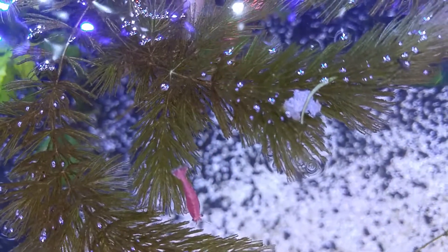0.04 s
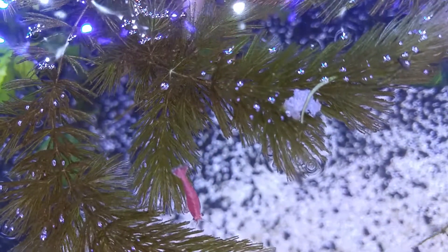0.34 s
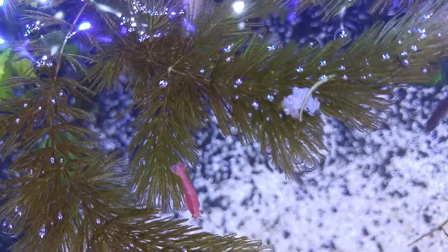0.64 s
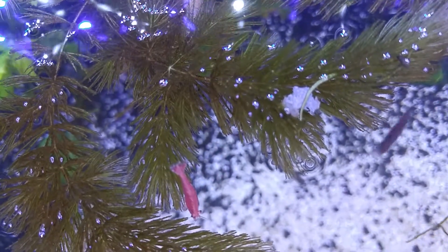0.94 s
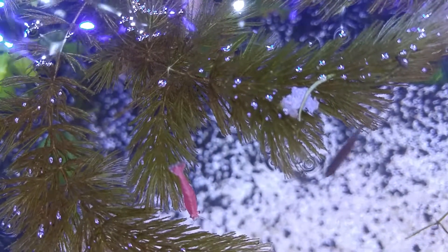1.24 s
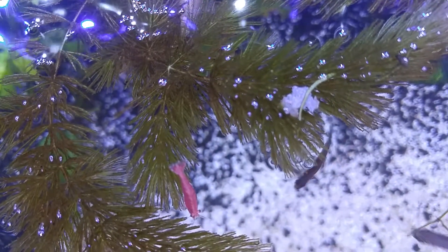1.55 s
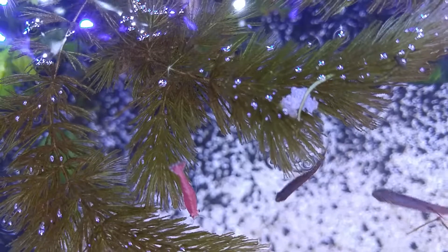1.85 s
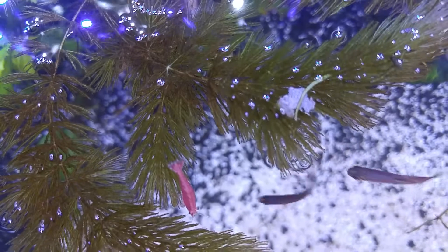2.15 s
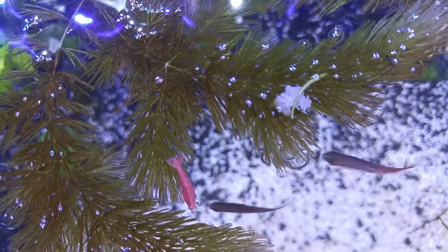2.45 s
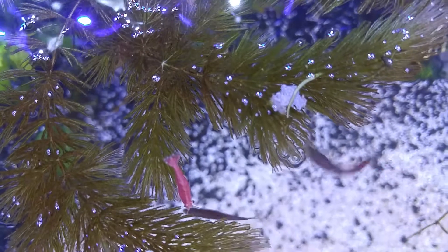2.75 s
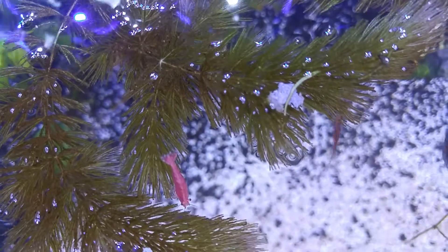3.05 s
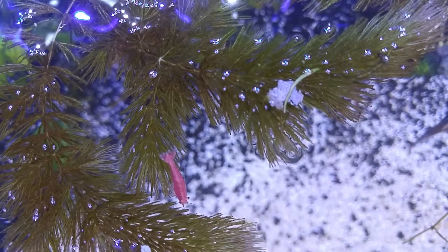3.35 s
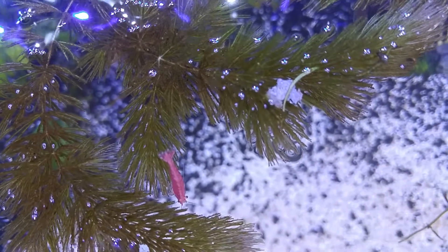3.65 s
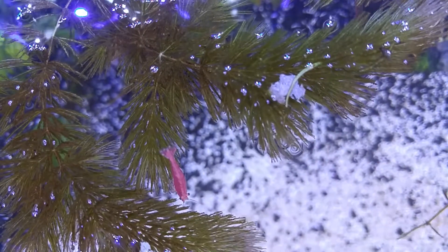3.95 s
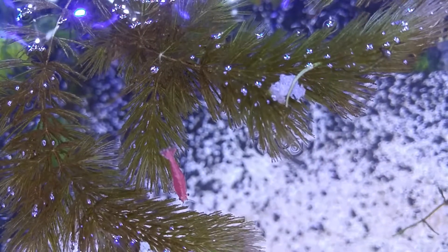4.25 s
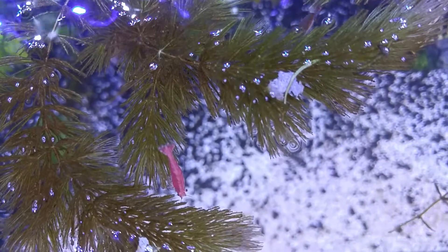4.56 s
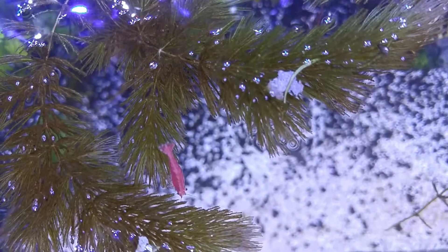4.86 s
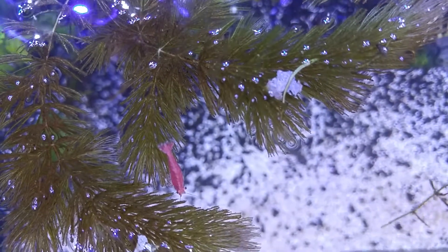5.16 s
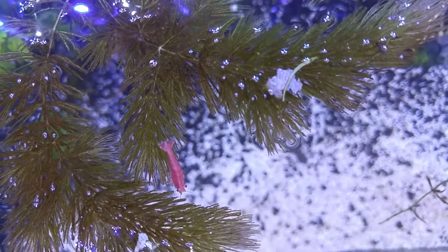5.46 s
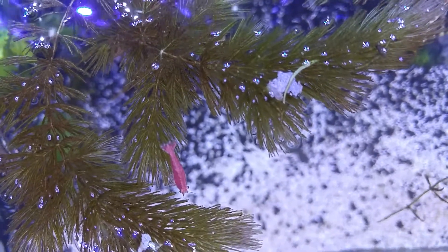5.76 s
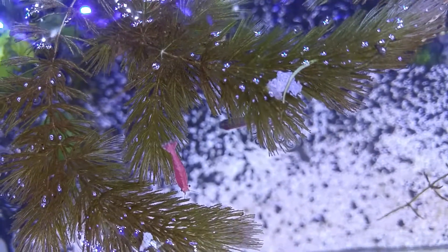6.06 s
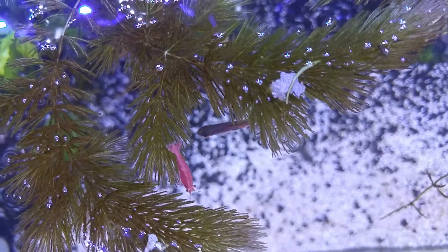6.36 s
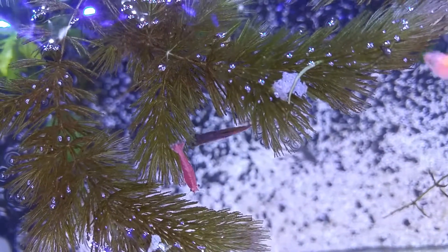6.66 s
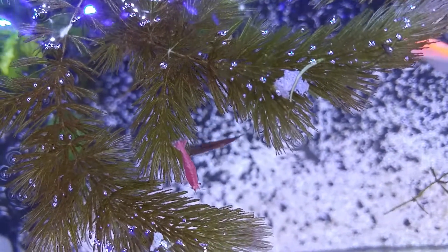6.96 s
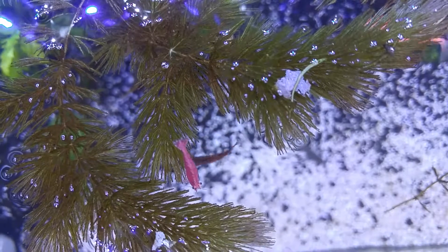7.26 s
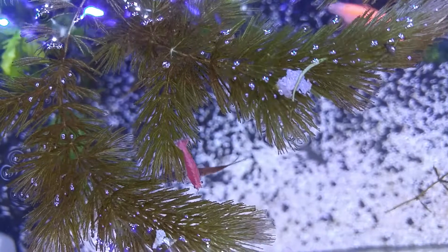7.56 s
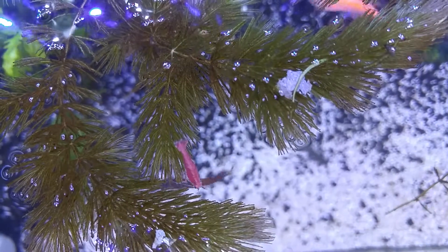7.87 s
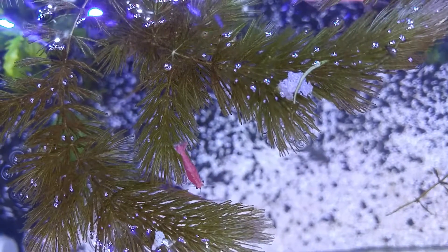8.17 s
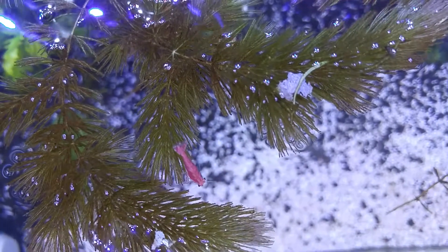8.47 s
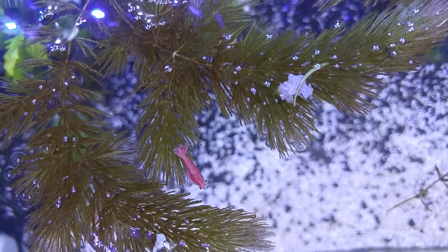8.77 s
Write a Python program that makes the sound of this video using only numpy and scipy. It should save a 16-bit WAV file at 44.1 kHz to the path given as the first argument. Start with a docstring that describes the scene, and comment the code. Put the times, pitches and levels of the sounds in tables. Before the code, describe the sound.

Heard from beside the glass of an indoor fish tank, a pump drones and chatters steadily over gently circulating water and a faint fizz. Early on there is a thin trickle, with small bubble ticks and several light clacks. The trickle fades, a few soft plops follow and the hum eases slightly, continuing with sparser ticks and a couple of faint clacks near the end.

```python
"""An aquarium pump hums on mains power, close by in a quiet room. Its loose rotor chatters on every
turn, now and then with a harder clack, and its electronics whine faintly. At first a light trickle
runs, and tiny bubbles tick and fizz. From 1.4 to 3.4 s the pump eases a little as its load drops.
After 2 s the trickle dies away and the fizz softens slightly; around 3 s the water gives a few soft
plops. The pump, the flowing water and the bubbles carry on to the end."""
import sys
import numpy as np
from scipy import signal
from scipy.fft import rfft, irfft
from scipy.io import wavfile

SR = 44100
rng = np.random.default_rng(int(sys.argv[2]) if len(sys.argv) > 2 else 0)


def put_to_file(sound):
    """Save the sound as 16-bit audio at rate SR, in the file named by the first command-line argument."""
    columns = np.atleast_2d(sound).T  # one column per channel
    safe = np.clip(columns, -1, 1)
    whole_steps = np.round(safe * 32767)
    wavfile.write(sys.argv[1], SR, whole_steps.astype(np.int16))


N = 389403
TIME = np.arange(N) / SR
MAINS_HZ = 60.037  # the rotor turns once per cycle of the mains

# the rotor's knocks within one turn: place_in_turn (0-1), force_db
ROTOR_KNOCKS = [(.02, 0), (0.238, -0.5), (0.391, 1.5), (0.739, 2)]
# how the housing and tank shape the sound of a knock: pitch_hz, gain_db
HOUSING_TONE = [(450, -55), (520, -37), (600, -12), (700, -11), (835, 2.5), (930, -6), (1010, -0.5),
                (1250, -13), (1480, -23.5), (1630, -21.5), (2070, -25), (2500, -39), (4000, -49.5)]


def pump_hum(turns, drone_db=-47.3, overtones_db=-47, waver=0.031):
    """The sound that repeats on every turn: a magnetic drone and the overtones of the knocks."""
    # the pump's steady tones, the drone first: multiple_of_mains, relative_db
    hum_tones = [(2, 0), (3, -26.5), (4, -25), (5, -27), (6, -14), (7, -16.5), (8, -24), (9, -36.5),
                 (10, -18), (11, -41.5), (12, -38.5), (13, -36), (14, -8.5), (15, -18), (16, -14),
                 (17, -22.5), (18, -27), (19, -24.5), (20, -28.5), (21, -24.5), (22, -32.5), (23, -32.5),
                 (26, -35.5), (27, -31.5)]
    body = knock_response(HOUSING_TONE)
    overtones = np.zeros(N)
    for multiple, db in hum_tones[1:]:
        # each overtone is timed by the knocks and delayed by the housing
        knocks = sum(gain_of(force_db) * np.exp(-2j * np.pi * multiple * place)
                     for place, force_db in ROTOR_KNOCKS)
        housing = body @ np.exp(-2j * np.pi * multiple * MAINS_HZ * TIME[:len(body)])
        overtones += gain_of(db) * np.cos(2 * np.pi * multiple * turns + np.angle(knocks * housing))
    drone = gain_of(drone_db + extra_load_db()) * np.sin(2 * np.pi * 2 * turns)
    return np.sqrt(2) * (drone + gain_of(overtones_db) * (1 + waver * drift(9.7)) * overtones)


def extra_load_db(start_db=1.32, ease_from_s=1.4, ease_to_s=3.4):
    """The pump starts a little louder under extra load, which then falls away."""
    return start_db * np.interp(TIME, [ease_from_s, ease_to_s], [1, 0])


def rotor_chatter(level_db=-54.5, scatter_turns=0.06, rub=0.54, unevenness=3.5, load_share=0.6):
    """The loose rotor lands a little harder or softer, earlier or later, on every turn."""
    turn = np.arange(int(N / SR * MAINS_HZ) + 1)
    blows = np.zeros(N)
    for place, db in ROTOR_KNOCKS:
        late, force = rng.uniform(-1, 1, (2, len(turn)))
        hit_samples = np.round((turn + place + scatter_turns * late) * SR / MAINS_HZ).astype(int)
        blows[hit_samples % N] += gain_of(db) * (np.sign(force) + unevenness * force)
    strength = gain_of(level_db + load_share * extra_load_db() + 0.4 * drift(3))
    return strength * shape_tone(unit_level(blows) + rub * rng.standard_normal(N), HOUSING_TONE)


def rotor_clacks():
    """Now and then the rotor hits the housing harder."""
    # the hardest knocks: start_s, peak_db
    hard_knocks = [(0.493, -41), (.877, -36), (1.677, -44), (1.809, -39), (2.727, -39), (7.258, -47),
                   (8.706, -43)]
    out, body = np.zeros(N), knock_response(HOUSING_TONE)
    for start_s, db in hard_knocks:
        add(out, start_s, gain_of(db) * body / abs(body).max())
    return out


def water_plops(rise_s=0.0079, detune=0.055):
    """Water gives the tank a soft push, and its low notes ring briefly."""
    # the pushes: start_s, peak_db, treble_lift_db_per_octave
    pushes = [(2.655, -41.5, 2), (2.813, -41, 2), (2.994, -42.5, 4), (3.116, -42, 6), (3.438, -50, 0),
              (3.555, -51, -2)]
    # the tank's own notes: pitch_hz, level_db, fade_s (time to drop 60 dB)
    tank_notes = [(397, -1, 0.053), (467, -3.5, 0.067), (543, -6.5, 0.038), (643, -3, 0.036),
                  (772, 1.5, 0.034), (940, -1, 0.027)]
    out = np.zeros(N)
    t = TIME[:SR // 8]
    for start_s, peak_db, lift_db in pushes:
        plop = np.zeros(len(t))
        variations = rng.uniform(-1.1, 1, (len(tank_notes), 2))
        for (hz, note_db, fade_s), (offset, phase) in zip(tank_notes, variations):
            bright_db = lift_db * np.log2(hz / tank_notes[0][0])
            fade = gain_of(note_db + bright_db - 60 * t / fade_s)
            plop += fade * np.sin(2 * np.pi * (hz * (1 + detune * offset) * t + phase))
        plop *= 1 - np.exp(-(t / rise_s) ** 2)
        add(out, start_s, gain_of(peak_db) * plop / abs(plop).max())
    return out


def large_bubbles(tick_hz=8430, pitch_spread=0.015, snap_hz=3650, fade_s=0.025):
    """Larger bubbles burst with a high tick and a lower snap, or leak their air in a thin squirt."""
    # bursting bubbles: start_s, level_db, snap_db (compared with the tick)
    bursts = [(0.0987, -47, -16), (0.1685, -49, 0), (0.2137, -48, 0), (0.4818, -48, -15), (0.5307, -48, -4),
              (1.064, -44, -2), (1.1812, -45, -5), (1.4136, -47, -6), (2.1793, -51, 6), (2.596, -47, 0),
              (2.813, -47, -2), (2.9462, -48, -4), (3.3119, -47, 5), (6.4643, -47, 11), (7.0753, -48, 5),
              (7.6919, -48, -3), (8.6464, -49, 2)]
    # squirts of escaping air: start_s, length_s, pitch_hz, level_db
    squirts = [(.715, .03, 8600, -69), (1.206, .19, 8800, -72), (2.31, 0.07, 7500, -75),
               (5.705, .06, 10100, -69), (5.852, 0.075, 9000, -70), (5.895, 0.14, 9900, -76),
               (7.215, .043, 9800, -70), (7.3, .046, 8700, -70), (7.907, .04, 8650, -70),
               (8.633, .046, 8600, -69)]
    out = np.zeros(N)
    t = TIME[:SR // 10]
    for start_s, db, snap_db in bursts:
        hz = tick_hz * (1 + pitch_spread * rng.standard_normal())
        tick = ringing_noise(len(t), hz, width_hz=1500)
        snap = gain_of(snap_db) * ringing_noise(len(t), snap_hz, width_hz=1600)
        add(out, start_s, gain_of(db - 10 - 60 * t / fade_s) * unit_level(tick + snap))
    for start_s, length_s, hz, db in squirts:
        progress = np.linspace(0, 1, int(length_s * SR))
        air = ringing_noise(len(progress), hz, width_hz=1600)
        add(out, start_s, gain_of(db - 0.2) * unit_level(np.sqrt(progress) * (1 - progress) * air))
    return out


def small_bubbles(per_s=20, base_db=-71, spread_db=1.3, fade_s=0.028, low_hz=2300, high_hz=4200):
    """Small bubbles snap at the surface here and there."""
    out = np.zeros(N)
    t = TIME[:SR // 20]
    for when, pitch, softness in rng.random((int(per_s * N / SR), 3)):
        snap = ringing_noise(len(t), low_hz + pitch * (high_hz - low_hz), width_hz=1500)
        fade = gain_of(base_db - spread_db * np.log(softness + .02) - 60 * t / fade_s)
        add(out, when * N / SR, fade * snap)
    return out


def bubble_fizz(turns, level_db=-73, trickle_boost_db=1.5, base_per_s=3000, pulsing=0.6):
    """Countless tiny bubbles are shaken loose in two spurts a turn, louder while the trickle runs."""
    # tone of the fine crackle of water in the pump: pitch_hz, gain_db
    fizz_tone = [(1800, -17), (2900, -3), (3300, -5), (3650, -0.5), (4150, -4.5), (4450, -2), (5100, -18),
                 (6400, -1), (7700, -18.5), (8300, 4), (9200, -8), (10400, -8), (11500, -10.5),
                 (15000, -35.5)]
    pop_chance = base_per_s / SR * np.exp(pulsing * np.cos(2 * np.pi * 2 * (turns - .23)))
    size_db = 3 * np.minimum(rng.exponential(1, N), 4)
    clump_db = 2.5 * drift(40)
    pops = (rng.random(N) < pop_chance) * gain_of(size_db + clump_db) * rng.choice([-1, 1], N)
    return gain_of(level_db + trickle_boost_db * trickle_strength()) * shape_tone(pops, fizz_tone)


def outlet_churn(turns, level_db=-71, flutter_db=2, pulsing=0.2):
    """Water churns through the outlet, pushed once a turn; each hollow note flutters on its own."""
    # the outlet's hollow notes: pitch_hz, width_hz, relative_db
    outlet_notes = [(1627, 124, -1), (1786, 164, 3.5), (2036, 160, 2), (2230, 120, -4)]
    hollow = sum(gain_of(db + flutter_db * drift(24)) * ringing_noise(N, hz, width_hz)
                 for hz, width_hz, db in outlet_notes)
    push = 1 + pulsing * np.cos(2 * np.pi * (turns - .3))
    return gain_of(level_db) * unit_level(hollow * push)


def trickle(level_db=-76, flutter_db=2):
    """A thin film of running water sizzles unevenly."""
    # where the trickle rings: pitch_hz, width_hz, relative_db
    sizzle_bands = [(4390, 420, -0.5), (5640, 480, -7), (6260, 780, -7.5), (6930, 440, -4.5)]
    sizzle = sum(gain_of(db) * ringing_noise(N, hz, width_hz) for hz, width_hz, db in sizzle_bands)
    return gain_of(level_db) * trickle_strength() * unit_level(sizzle * gain_of(flutter_db * drift(40)))


def trickle_strength(steady_until_s=2, fade_db_per_s=13):
    """The trickle runs steadily at strength 1, then dies away."""
    return gain_of(-fade_db_per_s * np.maximum(TIME - steady_until_s, 0))


def electronics_whine(turns, ripple=0.12):
    """The electronics give thin, high tones whose loudness ripples with the mains."""
    # the tones of the whine: pitch_hz, level_db
    whine_tones = [(3913.5, -80), (7827, -86.5), (11740.5, -101), (15654, -84)]
    supply = 1 + ripple * (np.cos(2 * np.pi * turns) + np.cos(2 * np.pi * 2 * turns))
    tones = sum(gain_of(db) * np.sin(2 * np.pi * hz * TIME) for hz, db in whine_tones)
    return np.sqrt(2) * supply * tones


def flow_and_room(flow_db=-61, boom_hz=73.5, hiss_db=-68):
    """Water circulates over the room's slowly swelling low boom and an even hiss."""
    # tone of the flowing water and low room noise: pitch_hz, gain_db
    flow_tone = [(20, -60), (31, -35), (42, -4), (56, -2.5), (86, -12), (130, -9), (152, -4), (170, -8),
                 (205, -11), (300, -8), (410, -4), (465, -20), (505, -24.5), (2000, -34.5)]
    # how the room's boom swells and sinks: time_s, level_db
    boom_levels = [(0.0, -68), (0.14, -58.5), (1.47, -66), (3.54, -63), (4.1, -73), (7.72, -72),
                   (8.83, -62)]
    # tone of the hiss: pitch_hz, gain_db
    hiss_tone = [(500, 11), (2500, 4.5), (3600, 2.5), (5000, 1), (6500, -1), (7700, 0.5), (9500, 2),
                 (11000, -5), (15700, -0.5)]
    water = gain_of(flow_db) * shape_tone(rng.standard_normal(N), flow_tone)
    boom_db = np.interp(TIME, *np.transpose(boom_levels)) - 1
    boom = gain_of(boom_db) * ringing_noise(N, boom_hz, width_hz=13)
    hiss = gain_of(hiss_db) * shape_tone(rng.standard_normal(N), hiss_tone)
    return water + boom + hiss


def gain_of(db):
    """Turns decibels into a number to multiply by."""
    return 10 ** (np.asarray(db) / 20)


def unit_level(sound):
    """Scales a sound to an average (rms) level of 1."""
    return sound / np.sqrt(np.mean(sound ** 2) + 1e-20)


def add(mix, start_s, sound):
    """Mixes a sound in at the given time."""
    part = mix[round(start_s * SR):][:len(sound)]
    part += sound[:len(part)]


def knock_response(tone, size=16384):
    """How a body with these (pitch_hz, gain_db) rows rings after one sharp knock."""
    hz, db = np.transpose(tone)
    outline_db = np.interp(np.log(abs(np.fft.fftfreq(size, 1 / SR)) + 1), np.log(hz), db)
    # time each pitch so that nothing sounds before the knock
    spectrum = np.exp(np.conj(signal.hilbert(np.log(gain_of(outline_db)))))
    return np.fft.ifft(spectrum).real[:size // 2]


def shape_tone(sound, tone):
    """Passes a sound through a body with that tone; comes out at level 1."""
    return unit_level(signal.fftconvolve(sound, knock_response(tone))[:N])


def drift(rate_hz):
    """A slow random wobble at level 1."""
    hz = np.fft.rfftfreq(N, 1 / SR)
    return unit_level(irfft(rfft(rng.standard_normal(N)) * np.exp(-(hz / rate_hz) ** 2), N))


def ringing_noise(samples, hz, width_hz):
    """Noise gathered around one pitch, at level 1."""
    b, a = signal.iirpeak(min(hz, SR / 2 - 1), hz / width_hz, SR)
    return unit_level(signal.lfilter(b, a, signal.lfilter(b, a, rng.standard_normal(samples))))


def scene():
    """Pump, water and bubbles, heard from one spot by the glass."""
    turns = MAINS_HZ * TIME
    pump = pump_hum(turns) + rotor_chatter() + rotor_clacks() + electronics_whine(turns)
    water = flow_and_room() + outlet_churn(turns) + trickle() + water_plops()
    bubbles = bubble_fizz(turns) + small_bubbles() + large_bubbles()
    return (pump + water + bubbles)[None]


def record(dry):
    """Cuts away the very highest treble."""
    cutoff_hz = 15760
    low_pass = signal.firwin(2047, cutoff_hz, window=("kaiser", 8), fs=SR)
    return signal.oaconvolve(dry, low_pass[None], "same")


dry = scene()
out = record(dry)
put_to_file(out)
```